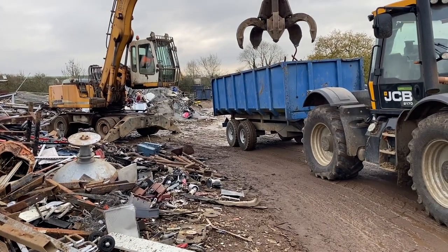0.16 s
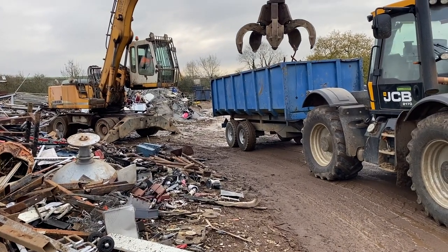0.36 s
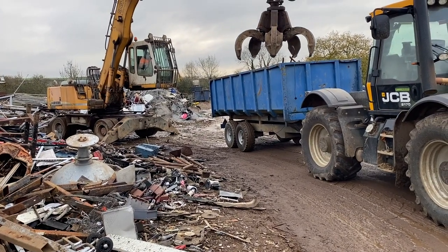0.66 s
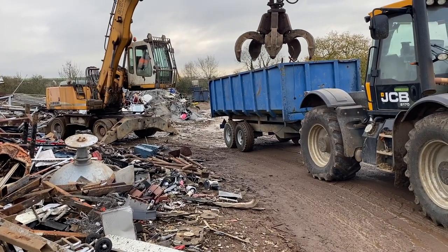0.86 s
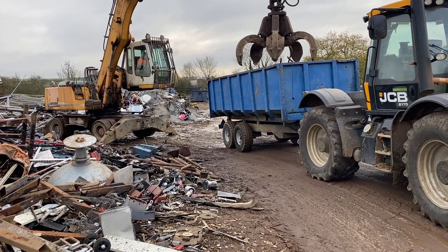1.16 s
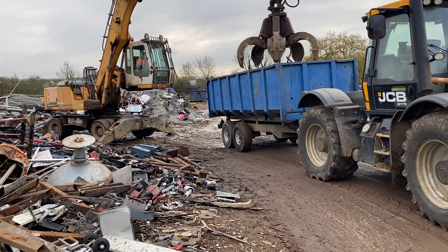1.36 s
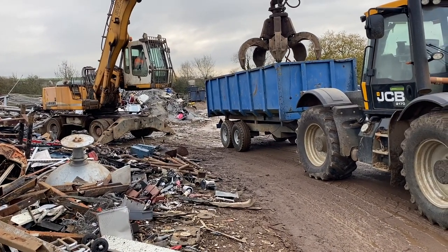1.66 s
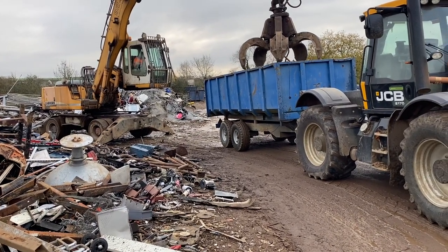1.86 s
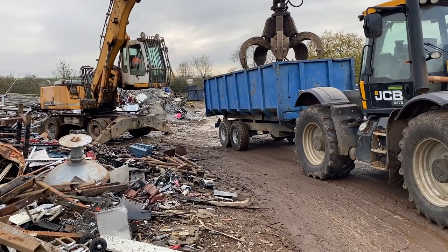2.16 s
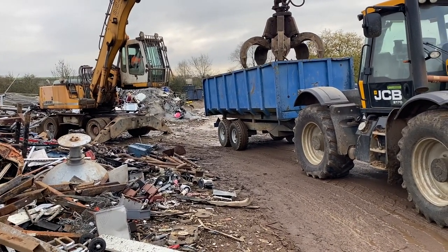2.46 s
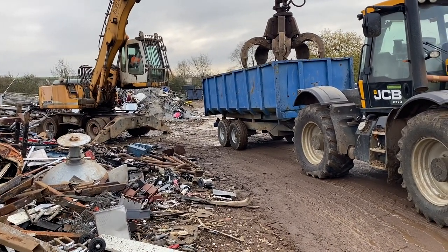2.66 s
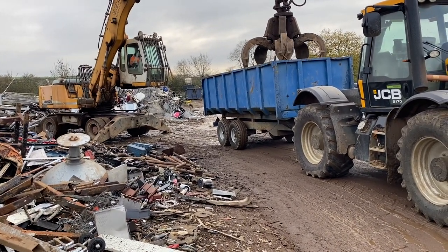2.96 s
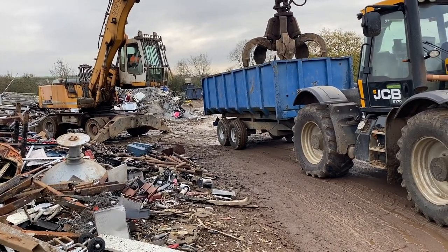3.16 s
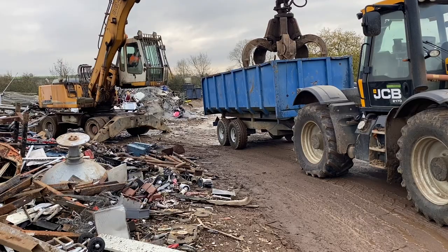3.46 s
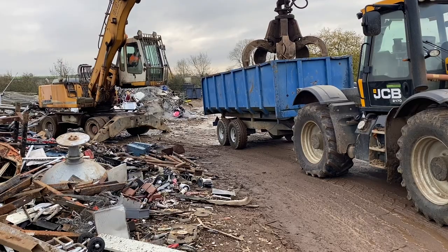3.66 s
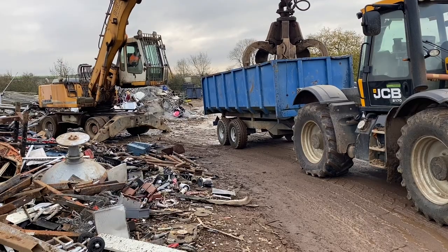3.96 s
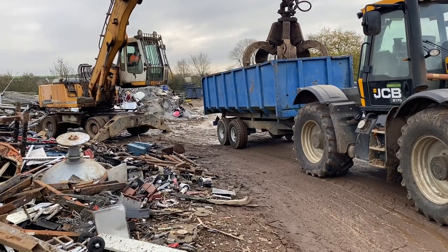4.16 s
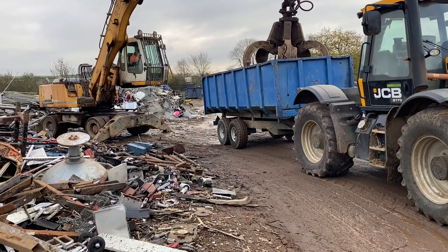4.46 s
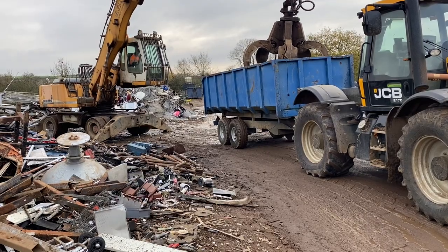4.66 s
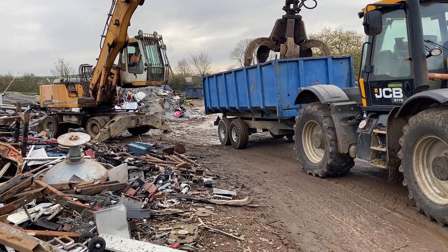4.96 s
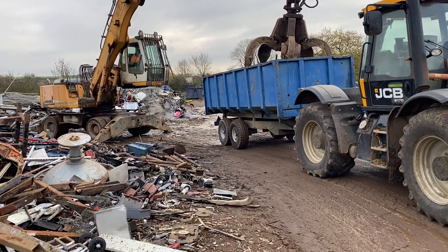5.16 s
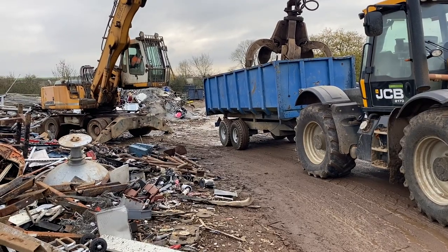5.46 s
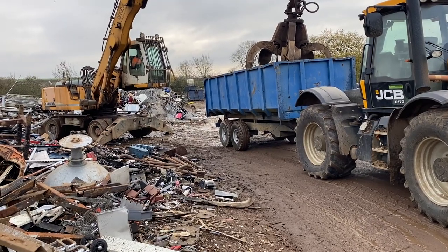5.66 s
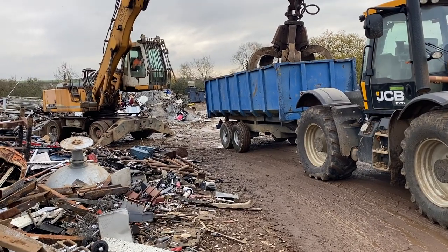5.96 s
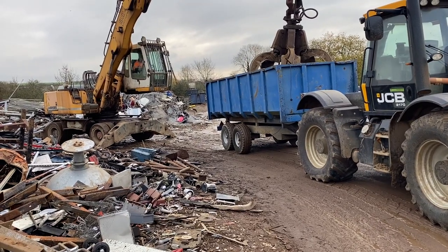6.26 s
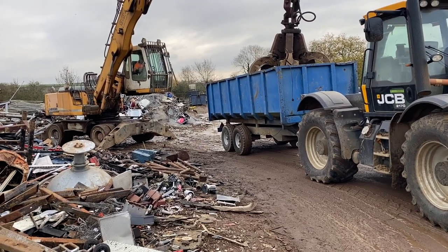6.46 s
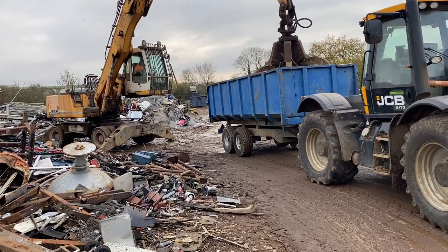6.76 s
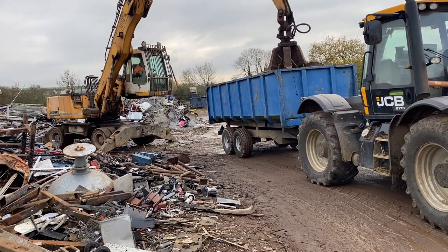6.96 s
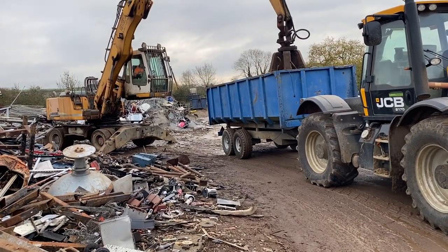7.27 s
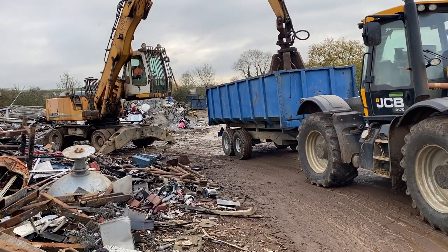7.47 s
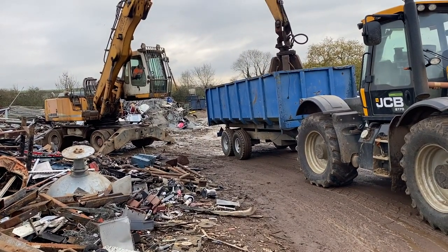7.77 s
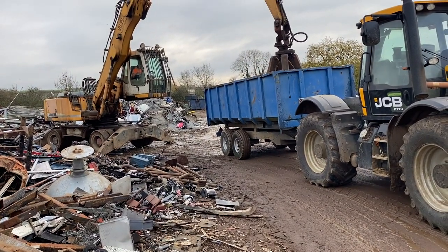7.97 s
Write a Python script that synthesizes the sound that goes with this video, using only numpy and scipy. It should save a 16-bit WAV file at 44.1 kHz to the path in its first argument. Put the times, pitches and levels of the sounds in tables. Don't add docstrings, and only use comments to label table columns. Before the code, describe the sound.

Outdoors in a scrap yard, a diesel tractor idles close on the right, knocking and ticking, with a farther machine's low drone and light wind buffeting the microphone. After about three seconds a grab lands with a dull thud in a steel trailer ahead; clanks and scrapes follow, then a sharp bang and dense sliding crashes with tinkling small parts.

```python
import sys
import numpy as np
from scipy import signal
from scipy.fft import rfft, irfft, next_fast_len
from scipy.io import wavfile
from scipy.ndimage import uniform_filter1d, map_coordinates

SR = 44100
rng = np.random.default_rng(int(sys.argv[2]) if len(sys.argv) > 2 else 0)


def master_out(mix):
    frames = np.transpose(np.atleast_2d(mix))
    ceiling = np.clip(frames, -1, 1)
    pcm = np.round(ceiling * 32767).astype(np.int16)
    wavfile.write(sys.argv[1], SR, pcm)


def invert_db(level):
    return 10 ** (np.asarray(level, dtype=float) / 20)


N = 357210
T = np.arange(N) / SR

# freq_hz, left_right_likeness [0-1]
LIKENESS = [(60, 0.98), (300, 0.62), (900, 0.34), (2500, 0.16), (4300, 0.86), (7000, 0), (9000, 0)]
# freq_hz, left_minus_right_db
PORT_TILT = [(60, 1.5), (100, -2), (180, -1.5), (300, -4), (510, -1), (880, -4), (1500, -2.5), (2560, 4),
             (4380, 1), (7480, 0)]

# freq_hz, level_db_per_hz
LOW_SPECTRUM = [(20, -30), (40, 2), (62, 5.5), (90, 4.5), (160, -6.5), (300, -43)]
# peak_s, length_s, shared_boom_db, port_wind_db
LOW_SWELLS = [(.35, .3, -30, -45), (1.427, 0.2, -23, -34), (2.0, 0.11, -24.5, -48), (2.303, 0.2, -26, -34),
              (2.74, 0.16, -26, -40), (3.112, 0.21, -21.5, -33), (3.572, 0.24, -17.5, -41),
              (4.07, 0.43, -22, -41), (4.444, 0.39, -23, -38), (4.8, 0.12, -25, -44), (4.974, 0.32, -49, -23),
              (5.15, 0.16, -23, -47), (5.64, 0.15, -15, -41), (6.002, 0.41, -30, -40), (6.48, 0.26, -19, -49),
              (6.781, 0.19, -31, -30), (7.02, 0.78, -20, -35), (7.748, 0.27, -17, -42), (8.1, 0.16, -18.5, -43)]

# time_s, firing_hz
FAR_FIRING = [
    (0, 100.1),
    (1.2, 100),
    (1.5, 99.3),
    (3.1, 99.3),
    (3.4, 100.2),
    (4, 100),
    (4.4, 99.3),
    (5, 99.4),
    (5.3, 100.3),
    (8.1, 100.2),
]
# firing_multiple [-], over_firing_db, phase_rad
FAR_ORDERS = [(1.5, -15, 5.05), (2.25, -16, 0), (4.5, -24, 0)]
# freq_hz, level_db_rms
PUMP_LINES = [(55, -34), (117.4, -36), (234.8, -48), (352, -49), (656, -52), (4190, -63)]

# time_s, crank_lead_cycles
GOVERNOR_LEAD = [(0, 0), (.45, .005), (1.6, .031), (3.2, .031), (4.95, -.009), (6.2, -.02), (7.3, -.002),
                 (8.1, -.011)]
# cycle_multiple [-], level_db_rms; the faint 36th order lies close to the far engine's own line
# near 225 Hz
EXHAUST_ORDERS = [(6, -36), (8, -38), (12, -30), (14, -41), (24, -39), (36, -51), (42, -45), (46, -42),
                  (48, -33), (50, -43), (52, -50), (54, -44), (72, -45.5), (78, -53)]
# place_cycle [0-1], ring_hz, peak_db, t60_s
BLOCK_KNOCKS = [(.04, 1280, -23, .03), (.068, 1200, -19.5, .035), (.348, 1237, -16, .032),
                (.395, 1238, -21, .035), (.518, 1269, -13.5, .029), (.585, 1241, -23, .035),
                (.865, 1149, -22.5, .03), (.905, 1260, -22, .03), (.236, 2087, -35, .09),
                (.625, 1200, -23.5, .04), (.72, 2050, -34, .08), (.19, 1180, -27, .035)]
# place_cycle [0-1], hiss_rise_db
VALVE_CLATTER = [(.02, 9), (.192, 6.5), (.345, 13.5), (.52, 8.5), (.685, 11.5), (.855, 4.5)]
# freq_hz, level_db_per_hz
ROAR_SPECTRUM = [(22, -45), (45, 2.5), (110, -8), (170, -7.5), (300, -5), (450, -8.5), (580, -16.5),
                 (750, -13.5), (1350, -14), (1600, -21), (2050, -19), (2600, -21.5), (3300, -28)]
# freq_hz, level_db_per_hz
HISS_SPECTRUM = [(1500, -2.5), (3000, 7), (4200, 8), (4900, 3.5), (5600, 2.5), (7000, 0.5), (8200, -4.5),
                 (10500, -10.5), (12200, -12), (14700, -19.5), (16000, -54)]
INJECTOR_TICKS = [(.025, -40.5), (.19, -52), (.342, -45), (.395, -42.5), (.53, -49), (.678, -43.5),
                  (.732, -44)]
# freq_hz, level_db_per_hz
TICK_SPECTRUM = [(3600, -45), (4100, 0), (4330, 8), (4550, -3), (5000, -40)]
INJECTOR_HZ = np.array([4420, 4300, 4320, 4300, 4220, 4300])
# start_s, peak_db, pitch_hz
HARD_TICKS = [(0.113, -28, 4200), (0.164, -27, 4440), (0.4288, -29, 4240), (0.7022, -28, 4370),
              (1.7615, -23, 4480), (1.924, -26, 4460), (2.2432, -32, 4440), (2.7246, -27, 4410),
              (2.7755, -27, 4370), (3.046, -25, 4420), (3.3163, -25, 4170), (4.1195, -25.5, 4210),
              (4.354, -24, 4260), (4.4921, -29, 4360), (4.6527, -27, 4400), (5.3531, -23, 4260),
              (5.7238, -25, 4390), (6.3644, -27, 4460), (6.4172, -24, 4410), (6.6821, -27, 4400),
              (8.074, -27, 4410)]

# freq_hz, level_db_per_hz
SCRAPE_SPECTRUM = [(300, -24), (500, -2), (900, 2.5), (1500, -6), (2100, -4), (3000, -12), (4500, -16),
                   (7000, -21), (10000, -31.5)]
# freq_hz, level_db_per_hz
SHOWER_SPECTRUM = [(2500, -18), (4200, 3), (7000, -1.5), (8300, -2), (10500, -11), (12200, -13),
                   (14700, -24), (16000, -43)]
# freq_hz, level_db_per_hz
TRAILER_SPECTRUM = [(60, -24), (130, 5), (250, 1), (450, 1.5), (800, -47)]
# peak_s, length_s, scrape_db, trailer_weight_db
SLIDES = [(3.16, 0.26, -46, 8), (3.53, 0.17, -41, 9), (4.102, 0.36, -41, 0.5), (4.4, 0.14, -34, 0),
          (4.595, 0.12, -33, -5), (4.774, 0.17, -54, 0), (5.04, 0.35, -37, 4), (5.52, 0.12, -35, -3),
          (5.66, 0.25, -34.5, 7), (5.892, 0.16, -27, 3), (6.065, 0.19, -36, 7), (6.218, 0.075, -42, -15),
          (6.397, 0.09, -31.5, 2), (6.57, 0.19, -27, 1), (6.86, 0.19, -24, 2.5), (7.019, 0.26, -18, 3.5),
          (7.194, 0.12, -25, 3.5), (7.4, 0.34, -29.5, -0.5), (7.666, 0.24, -18.5, 0.5),
          (7.809, 0.2, -25.5, 6.5), (8.055, 0.57, -28, 3)]

# freq_hz, level_db, t60_s
BAR_MODES = [(1580, -7, .3), (1790, -2, .25), (2020, 0, .7), (2200, -2, .4), (2490, -4, .3), (2620, -4, .4),
             (2960, -6, .3), (3240, -8, .3), (3500, -6, .25), (3760, -9, .15), (4260, -8, .2),
             (4810, -10, .3), (5250, -15, .2), (6650, -14, .2)]
# start_s, strongest_mode_db
BAR_LANDINGS = [
    (5.776, -34.5),
    (5.854, -30),
    (5.89, -30),
    (5.925, -30.5),
    (6.015, -33),
    (6.045, -37.5),
    (6.575, -36),
]
# start_s, ring_hz, peak_db
PIECES = [(6.8, 1028, -26), (6.825, 1894, -24), (6.86, 857, -22), (6.862, 2200, -25), (6.888, 918, -28),
          (6.927, 1837, -32), (6.933, 1033, -24), (6.949, 2040, -26), (6.969, 3460, -31),
          (6.978, 965, -13.5), (6.979, 2500, -25), (6.982, 3904, -29), (6.989, 1870, -27),
          (7.004, 2170, -31), (7.007, 2469, -33), (7.024, 3750, -31), (7.026, 2750, -27),
          (7.032, 1378, -23), (7.034, 990, -21), (7.034, 2080, -24), (7.058, 1760, -21), (7.058, 2469, -24),
          (7.078, 1050, -21), (7.082, 2540, -26), (7.087, 1665, -28), (7.09, 1952, -32), (7.1, 855, -25),
          (7.13, 1640, -20.5), (7.148, 805, -22), (7.187, 1940, -29), (7.529, 1300, -20), (7.592, 925, -26),
          (7.596, 2250, -22), (7.599, 1305, -25), (7.603, 1710, -22), (7.612, 2460, -27),
          (7.612, 4191, -35), (7.615, 2170, -28), (7.627, 970, -20), (7.634, 2296, -27), (7.645, 977, -16),
          (7.658, 1837, -25), (7.676, 2239, -30), (7.677, 800, -19), (7.677, 1205, -27), (7.688, 2756, -34),
          (7.692, 1780, -33), (7.713, 908, -18), (7.715, 2660, -32), (7.719, 2050, -19), (7.721, 3617, -33),
          (7.735, 2620, -24), (7.741, 864, -18), (7.756, 1952, -25), (7.764, 976, -31), (7.776, 631, -21),
          (7.777, 1780, -30), (7.796, 1205, -24), (7.817, 1200, -21), (7.822, 2080, -21),
          (5.782, 3416, -36), (5.855, 1780, -25), (5.89, 2497, -24), (5.92, 2440, -32), (6.017, 2497, -26),
          (6.035, 4730, -31), (6.075, 2630, -31), (6.405, 1710, -29), (6.558, 2520, -21), (6.86, 427, -19),
          (6.975, 5713, -34), (6.993, 5455, -35), (7.19, 2727, -29), (7.22, 2641, -33), (7.372, 7665, -24),
          (7.388, 4507, -27), (7.504, 2268, -31), (7.605, 318, -13.5), (7.664, 4507, -27),
          (7.664, 6546, -39), (7.69, 3129, -34), (7.721, 4794, -31), (5.565, 2190, -29), (5.668, 1750, -30),
          (6.45, 1020, -25), (6.315, 1750, -29), (6.335, 1490, -35), (6.44, 150, -17), (6.53, 1860, -22),
          (3.82, 1740, -32)]
# start_s, peak_db, ring_hz, t60_s
PANEL_RINGS = [(3.497, -29, 750, .12), (3.5, -27, 450, .12), (4.802, -15, 151, 0.14),
               (4.845, -20, 341, 0.15), (5.472, -17.5, 337, 0.18), (5.499, -26.5, 1770, 0.14),
               (5.554, -20, 215, .15), (5.668, -29, 1210, 0.074), (5.791, -19, 425, .14),
               (5.855, -20, 1105, 0.08), (5.855, -16, 1205, .08), (5.857, -13.5, 385, 0.12),
               (5.866, -15.5, 280, 0.2), (5.876, -16.5, 433, 0.16), (5.905, -13, 203, 0.15),
               (6.018, -45, 1500, .08), (6.018, -33, 757, 0.23), (6.557, -11, 1200, 0.055),
               (6.573, -11, 1950, .085), (4.811, -23, 199, .12), (4.934, -17.5, 442, 0.14),
               (6.398, -16, 882, 0.11), (6.4, -28, 1600, 0.11), (6.575, -23, 757, .17),
               (6.598, -25, 1800, 0.18), (6.558, -18, 2430, 0.11), (5.854, -23, 3750, 0.052),
               (5.854, -23, 4600, 0.055), (5.776, -28, 1760, .1)]

# freq_hz, level_db_per_hz
DULL_SPECTRUM = [(350, -0.5), (600, 4.5), (1000, 6.5), (1500, -15), (2200, -12)]
# freq_hz, level_db_per_hz
EDGE_SPECTRUM = [(1200, 3.5), (1900, 8), (2600, 1), (4500, -2.5), (7500, -24), (11000, -30)]
# ring_multiple [-], level_db
PLATE_MODES = [(1.002, -1), (1.129, -11), (1.259, -3), (1.45, -12), (1.64, -16), (1.9, -6), (2.16, -9),
               (2.6, -20), (3.3, -23)]
# start_s, peak_db, ring_hz, edge_db, t60_s
THUMPS = [
    (3.5, -18, 841, -21, 0.17),
    (3.549, -28.5, 714, -21, 0.33),
    (5.469, -15.5, 805, -10.5, 0.14),
    (5.553, -19.5, 692, -15, 0.53),
    (5.776, -19.5, 1744, 1, 0.29),
    (5.854, -14.5, 872, 5.5, 0.24),
    (5.922, -20, 1970, -5, 0.13),
    (6.286, -33, 2030, 3, 0.13),
    (6.565, -18, 1400, 5, 0.18),
]
# start_s, peak_db, ring_hz, edge_db, t60_s
CLANKS = [(3.599, -19, 1180, -19, 0.098), (3.82, -16.5, 993, -2, 0.085), (3.883, -19, 1326, -2, 0.087),
          (4.998, -16, 874, -12, 0.1), (5.498, -21, 1630, -15, 0.31), (6.016, -20, 2566, 0, 0.16),
          (6.205, -35, 1070, 11.5, 0.55), (6.314, -28, 973, -3.5, 0.34), (6.4, -13, 924, -9.5, 0.25),
          (6.555, -5, 1024, 0.5, 0.16), (6.577, -15.5, 772, -20, 0.71), (6.797, -13, 1030, -20, 0.39),
          (6.974, -10.5, 990, -4, 0.24), (7.196, -16.5, 990, -6, 0.29), (7.532, -16, 1370, -4, 0.11),
          (7.6, -26, 1196, 0, 0.24), (7.727, -10.5, 961, -13, 0.27), (7.813, -17.5, 1220, -1, 0.35)]
# start_s, peak_db, pitch_hz, t60_s
THUDS = [
    (3.09, -15, 67, 0.4),
    (3.5, -14, 69, 0.41),
    (4.912, -22, 438, 0.27),
    (5.561, -14.5, 62.5, 0.92),
    (6.04, -19.5, 449, 0.21),
    (6.398, -16, 56, 0.36),
    (7.386, -17, 425, 0.11),
    (7.498, -19, 143, 0.17),
    (2.8, -31, 111, 0.35),
]
# start_s, peak_db, ring_hz, t60_s, extra_sparkle_db
TINKS = [(4.348, -22, 7860, 0.28, 5.5), (4.3794, -43, 4820, 0.11, 9), (4.568, -32, 5400, 0.19, 8),
         (4.6894, -31, 5270, 0.098, 3), (5.5024, -31, 7080, 0.11, 8), (5.853, -23.5, 4770, 0.23, 3.5),
         (5.9259, -28, 4900, 0.078, -4), (6.013, -30.5, 4930, 0.32, 3), (6.2094, -34, 5570, 0.57, 6),
         (6.4014, -30, 4770, 0.12, 3), (6.558, -11.5, 7040, 0.052, -11), (6.721, -26.5, 7300, 0.15, -6),
         (7.0128, -16, 7400, 0.18, -8), (7.2769, -26.5, 5780, 0.16, -1), (7.3715, -9.5, 7400, 0.12, -0.5),
         (7.6028, -20, 5300, 0.22, -1.5), (7.7294, -19.5, 5490, 0.14, 4)]

# from_hz, to_hz, gain_db
MID_GAPS = [(8350, 9550, -45), (12400, 14000, -45), (15300, 17000, -18)]
# from_hz, to_hz, gain_db
SIDE_GAPS = [(6200, 7500, -8), (6750, 7450, -22), (10350, 12000, -45), (14300, 17000, -35)]


def unit(x):
    return x / np.sqrt(np.mean(x ** 2) + 1e-20)


def along(points, hz):
    f, v = np.transpose(points)
    return np.interp(np.log(hz + 1), np.log(f + 1), v)


def falling(spectrum, hz):
    octaves_above = np.log2(np.maximum(hz / spectrum[-1][0], 1))
    return invert_db(along(spectrum, hz) - 30 * octaves_above)


def curve(rows):
    s, value = np.transpose(rows)
    return np.interp(T, s, value)


def wobble(rate_hz):
    knots = rng.standard_normal(int(N * rate_hz / SR) + 4)
    return map_coordinates(knots, [T * rate_hz])


def filtered(x, response):
    m = next_fast_len(N + 8192)
    return irfft(rfft(x, m) * response(np.fft.rfftfreq(m, 1 / SR)), m)[..., :N]


def rush(spectrum, likeness, patchy_db, grain=1):
    z = signal.stft(rng.standard_normal((2, N)), nperseg=512)[2]
    field = uniform_filter1d(rng.standard_normal(z.shape[1:]), size=5, axis=0)
    field = uniform_filter1d(field, size=8, axis=1)
    patchy = signal.istft(z * invert_db(patchy_db * unit(field)), nperseg=512)[1][:, :N]

    def mid_side(hz):
        turn_rad = np.arccos(np.clip(along(likeness, hz), -1, 1)) / 2
        return falling(spectrum, hz) * [np.cos(turn_rad), np.sin(turn_rad)]

    mid, side = filtered(grain * patchy, mid_side)
    return unit(np.array([mid + side, mid - side]))


def placed(s, shapes):
    size = shapes.shape[1]
    at = np.round(np.maximum(s, 0) * SR).astype(int)[:, None] + np.arange(size)
    return np.bincount(at.ravel(), shapes.ravel(), N + size)[:N]


def rings(s, hz, db, t60, size, rise_s=.001):
    t = np.arange(size) / SR
    decay = invert_db(db[:, None] - 60 * t / t60[:, None])
    rise = 1 - np.exp(-t / rise_s)
    return placed(s, decay * np.sin(2 * np.pi * hz[:, None] * t) * rise)


def bursts(s, db, t60):
    t = np.arange(SR // 2) / SR
    decay = invert_db(db[:, None] - 60 * t / t60[:, None])
    return placed(s, decay * np.minimum(t / .0018, 1))


def swells(s, length, db, floor_db):
    t = T[::128]
    bells = invert_db(db[:, None] - 24 * ((t - s[:, None]) / length[:, None]) ** 2)
    return np.interp(T, t, np.sqrt(invert_db(floor_db) ** 2 + np.sum(bells ** 2, axis=0)))


def ports(pair, lag_s):
    def half(hz):
        turn_rad = np.minimum(np.pi * hz * lag_s, np.pi)
        return invert_db(along(PORT_TILT, hz) / 2) * np.exp(-1j * turn_rad)

    return filtered(pair, lambda hz: np.array([half(hz), 1 / half(hz)]))


def booms_and_wind():
    s, length, boom_db, port_db = np.transpose(LOW_SWELLS)
    boom = rush(LOW_SPECTRUM, [(50, 0.99)], patchy_db=3)
    power = np.abs(uniform_filter1d(boom ** 2, size=4096)).mean(axis=0)
    boom = boom / np.sqrt(power + .1)
    buffeting = rush(LOW_SPECTRUM, [(50, -0.59)], patchy_db=4.5)
    return swells(s, length, boom_db, -34) * boom + swells(s, length, port_db, -48) * buffeting


def far_machine():
    phase = 2 * np.pi * np.cumsum(curve(FAR_FIRING)) / SR
    firing = np.sin(phase) + invert_db(-16.5) * np.sin(phase / 2)
    for multiple, db, rad in FAR_ORDERS:
        firing += invert_db(db) * np.cos(multiple * phase + rad)
    lines = invert_db(-25) * firing
    for hz, db in PUMP_LINES:
        lines += invert_db(db + 2.9 * wobble(8)) * np.sin(2 * np.pi * hz * T + 1.35 * wobble(1.982))
    return np.sqrt(2) * lines * invert_db([[-.6], [.6]])


def since(crank, place):
    return (crank - place) % 1


def exhaust(crank):
    tones = 0
    for k, db in EXHAUST_ORDERS:
        tones += np.sqrt(2) * invert_db(db + 1.7 * wobble(8)) * np.cos(2 * np.pi * k * crank + k * k)
    return tones


def block_knocks(crank):
    place, hz, db, t60 = np.tile(np.transpose(BLOCK_KNOCKS), int(crank[-1]) + 1)
    place_chance, db_chance, hz_chance = rng.standard_normal((3, len(hz))) * [[.002], [1], [.022]]
    turns = np.arange(len(hz)) // len(BLOCK_KNOCKS) + place + place_chance
    db = np.where(turns < crank[-1], db + db_chance, -200)
    rows = np.array([np.interp(turns, crank, T), hz * (1 + hz_chance), db, t60])
    knocks = invert_db(-1) * rings(*rows[:, hz < 1700], size=4096, rise_s=.003)
    pings = rings(*rows[:, hz >= 1700], size=4096)
    return knocks, pings


def injectors(crank):
    gate = sum(invert_db(db) * np.exp(-since(crank, place) / 0.07) for place, db in INJECTOR_TICKS)
    firing = (6 * crank).astype(int)
    pitch, force = rng.standard_normal((int(6 * crank[-1]) + 9, 2))[firing].T
    tone_hz = INJECTOR_HZ[firing % 6] + 90 * pitch
    tone = np.sin(2 * np.pi * np.cumsum(tone_hz) / SR) * invert_db(2.5 * wobble(200))
    noise = rush(TICK_SPECTRUM, LIKENESS, patchy_db=1)
    ticks = uniform_filter1d(gate * invert_db(1.5 + 1.9 * force), size=64) * (.75 * noise + .55 * tone)
    s, db, hz = np.transpose(HARD_TICKS)
    return ticks + rings(s, hz, db - 2, np.full(len(s), .055), size=4096, rise_s=.002)


def valves_and_roar(crank):
    clatter_db = sum(db * np.exp(-since(crank, place) / 0.086) for place, db in VALVE_CLATTER)
    rise_db = uniform_filter1d(clatter_db, size=110)
    hiss_grain = invert_db(rise_db * (0.55 + 0.18 * wobble(34)))
    hiss = invert_db(-43.5) * rush(HISS_SPECTRUM, LIKENESS, patchy_db=1.1, grain=hiss_grain)
    roar = invert_db(-29) * rush(ROAR_SPECTRUM, LIKENESS, patchy_db=1.2, grain=invert_db(.35 * rise_db))
    return hiss + roar


def tractor():
    crank = 6.24 * T + curve(GOVERNOR_LEAD)
    knocks, pings = block_knocks(crank)
    engine = exhaust(crank) + knocks + injectors(crank) + valves_and_roar(crank)
    return ports(engine, lag_s=.00022) + ports(pings, lag_s=.00013)


def slides():
    s, length, db, weight_db = np.transpose(SLIDES)
    dig_s, stir_db = 2.9, -55
    on = np.clip((T - dig_s) / .1, 0, 1)
    near = [(100, 1.0), (1000, 0.77), (4000, 0.76), (9000, 0.021)]
    scrape_grain = invert_db(1.3 * wobble(50) + 2.2 * wobble(250))
    scrape = rush(SCRAPE_SPECTRUM, near, patchy_db=1.5, grain=scrape_grain)
    when, pitch, force, hold = rng.random((2400, 4)).T
    hz = 450 * 12 ** pitch
    clink_db = along(SCRAPE_SPECTRUM, hz) + 14 * force
    clinks = unit(rings(when * T[-1], hz, clink_db, .02 + .05 * hold, size=1536))
    shower_grain = invert_db(2 * wobble(120) + 3 * wobble(700))
    shower = rush(SHOWER_SPECTRUM, near, patchy_db=1.5, grain=shower_grain)
    trailer = rush(TRAILER_SPECTRUM, near, patchy_db=1.5)
    out = swells(s, length, db - 2.27, stir_db) * (scrape + 0.46 * clinks)
    out += swells(s, length, db - 2 + weight_db, stir_db + 7.9) * trailer
    out += swells(s, length, db - 14.5 - 0.67 * weight_db, stir_db - 27) * shower
    return on * out


def bar():
    s, db = np.transpose(BAR_LANDINGS + BAR_LANDINGS)
    out = 0
    for hz, level_db, t60 in BAR_MODES:
        mode_hz = hz + rng.normal(0, 20, len(s))
        mode_db = db + level_db - 5.5 + rng.normal(0, 1.5, len(s))
        mode = rings(s, mode_hz, mode_db, np.full(len(s), 1.05 * t60), size=8192)
        out += invert_db(3 * wobble(110)) * mode
    return out


def impacts():
    s, hz, db = np.transpose(PIECES)
    t60 = 0.1 * (1000 / hz) ** 0.21
    pieces = rings(s, hz, db + 1, t60, size=4096, rise_s=.0037)
    s, db, hz, t60 = np.transpose(PANEL_RINGS)
    panels = rings(s, hz, db, t60, size=8192, rise_s=.002)
    return invert_db(3 * wobble(140)) * pieces + invert_db(1.5 * wobble(120)) * panels


def plate_rings(s, db, hz, edge_db, t60):
    rattle = invert_db(3.5 * wobble(120))
    out = 0
    for k, level_db in PLATE_MODES:
        hz_chance, db_chance = rng.standard_normal((len(s), 2)).T
        mode_hz = hz * (k + 0.0334 * (k - 1) * hz_chance)
        mode_db = db + edge_db * (mode_hz > 1700) + level_db - 15.5 + 3 * db_chance
        out += rattle * rings(s, mode_hz, mode_db, 1.3 * t60, size=8192)
    return out


def tinks(likeness):
    s, db, hz, t60, sparkle_db = np.transpose(TINKS)
    spray = rush(SHOWER_SPECTRUM, likeness, patchy_db=1.5, grain=invert_db(2 * wobble(500)))
    sparkle = filtered(spray, lambda hz: hz > 9000)
    out = bursts(s, db - 8.5, t60) * (spray - sparkle)
    out += bursts(s, db - 8.5 + sparkle_db, t60) * sparkle
    return out + rings(s, hz, db - 13, .5 * t60, size=8192)


def blows():
    s, db, hz, edge_db, t60 = np.transpose(THUMPS + CLANKS)
    trailer_db = np.repeat([3.5, -4.5], [len(THUMPS), len(CLANKS)])
    wide = [(100, 1.0), (3000, 0.7), (9000, 0.035)]
    dull = rush(DULL_SPECTRUM, wide, patchy_db=2, grain=invert_db(2.2 * wobble(200)))
    edge = rush(EDGE_SPECTRUM, wide, patchy_db=2, grain=invert_db(2.5 * wobble(250)))
    trailer = rush(TRAILER_SPECTRUM, wide, patchy_db=1)
    out = bursts(s, db - 11.5, t60) * dull
    out += bursts(s, db + edge_db - 8, .9 * t60) * edge
    out += bursts(s, db + trailer_db - 10, 1.1 * t60) * trailer
    out += plate_rings(s, db, hz, edge_db, t60)
    s, db, hz, t60 = np.transpose(THUDS)
    return out + rings(s, hz, db, t60, size=24576) + tinks(wide)


def scene():
    scrap = slides() + bar() + impacts() + blows()
    return booms_and_wind() + far_machine() + tractor() + ports(scrap, lag_s=0)


def gap_gain(hz, gaps):
    depth_db = 0
    for lo, hi, db in gaps:
        depth_db = depth_db + db * np.clip(np.minimum(hz - lo, hi - hz) / 300 + .5, 0, 1)
    return invert_db(depth_db)


def thin_treble(pair):
    left, right = pair
    full = np.array([left + right, left - right]) / 2
    thin = filtered(full, lambda hz: np.array([gap_gain(hz, MID_GAPS), gap_gain(hz, SIDE_GAPS)]))
    treble = uniform_filter1d(np.abs(filtered(full[0], lambda hz: hz > 6000)), size=512)
    sharp = treble > invert_db(13) * np.roll(treble, 512)
    open_s, open_share = .035, .14
    near_attack = uniform_filter1d(1. * sharp, size=round(open_s * SR), origin=round(open_s * SR / 3))
    share = np.clip(near_attack * 20, 0, open_share)
    mid, side = thin + share * (full - thin)
    return np.array([mid + side, mid - side])


def top_cut(x):
    return signal.sosfilt(signal.butter(12, 15760, fs=SR, output="sos"), x)


def record(dry):
    limited = dry / (1 + np.abs(dry / .99) ** 8) ** (1 / 8)
    mix = thin_treble(limited)
    return top_cut(mix)


dry = scene()
out = record(dry)
master_out(out)
```